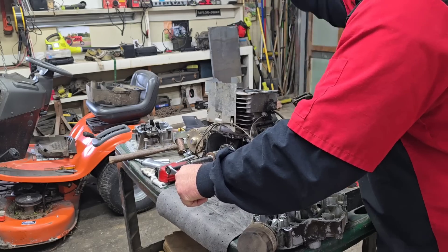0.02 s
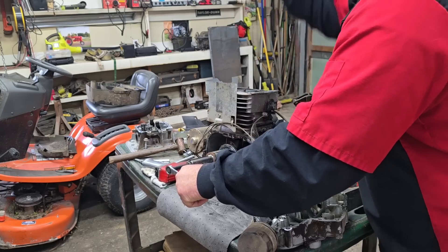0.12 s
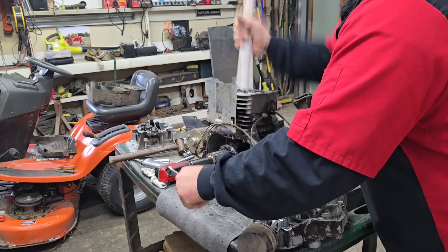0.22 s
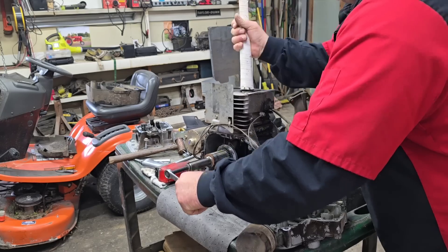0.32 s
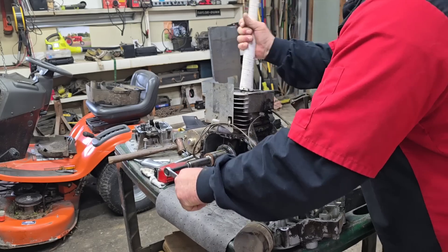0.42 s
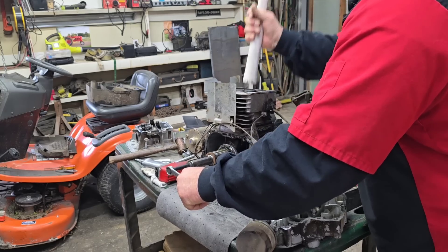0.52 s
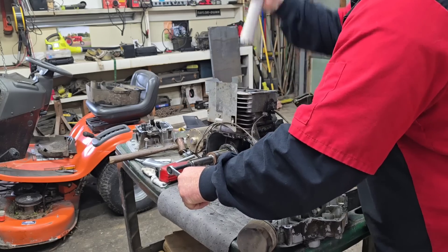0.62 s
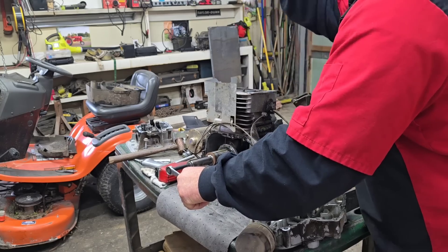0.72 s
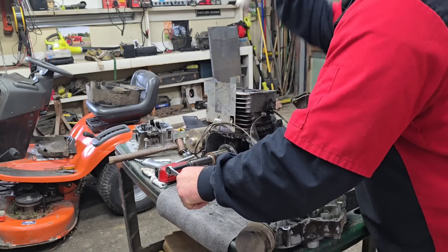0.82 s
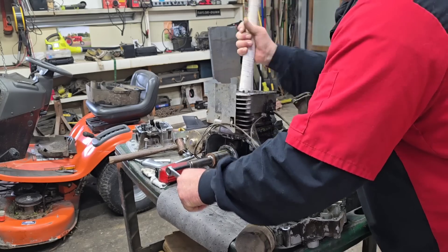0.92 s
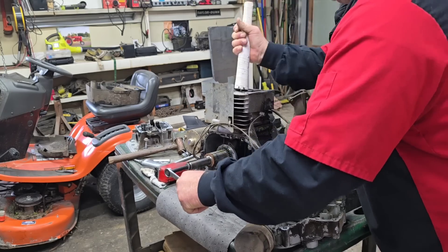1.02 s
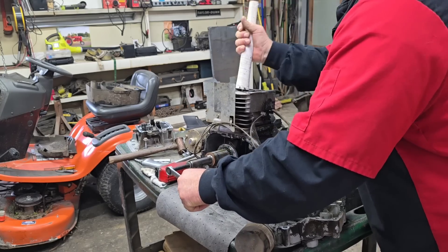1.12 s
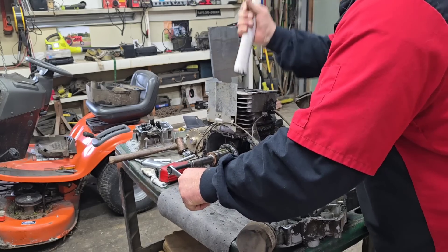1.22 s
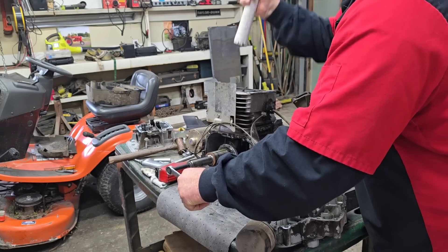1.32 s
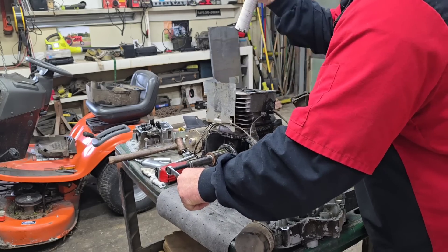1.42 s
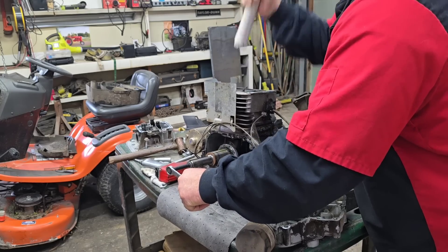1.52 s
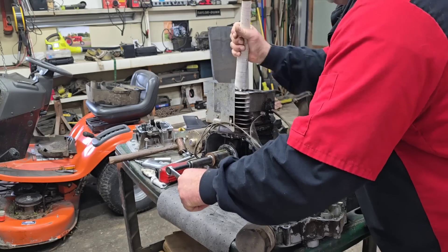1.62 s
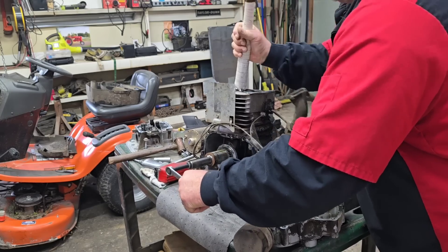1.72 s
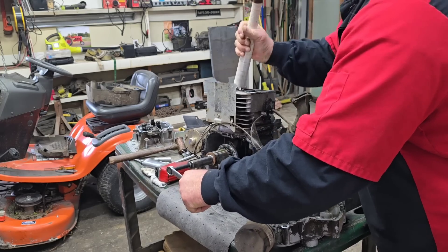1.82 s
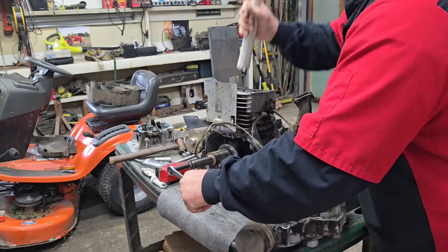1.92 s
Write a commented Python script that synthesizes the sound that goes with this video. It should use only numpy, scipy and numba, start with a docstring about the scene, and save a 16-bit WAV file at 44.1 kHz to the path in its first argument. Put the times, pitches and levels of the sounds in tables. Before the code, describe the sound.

A wooden-ended tool strikes a seized engine piston three times, loud cracks with low bench boom and metallic rattle, bounces and faint tool clinks between, in a quiet workshop, close microphone with flattened peaks.

```python
"""A barely audible workshop floor, then three heavy blows of a wooden-ended tool on a seized piston in an engine.
Each blow is a burst of contact noise that excites decaying modes of engine and bench, dense shaking and rattle.
Between blows the tool bounces (short noise), the engine rocks (low sines in dull noise), a loose part clacks
(noise and modes) and tools clink (thin sines). The recorder's limiter flattens the blows; its expander lowers the tails.
"""
import sys
import numpy as np
from scipy import signal
from scipy.fft import rfft, irfft
from scipy.io import wavfile
from scipy.ndimage import uniform_filter1d, minimum_filter1d
from numba import njit

SR = 44100
rng = np.random.default_rng(int(sys.argv[2]) if len(sys.argv) > 2 else 0)


def materialize(psi):
    """Save the field psi as 16-bit PCM at rate SR to the path in sys.argv[1].

    A 1-D psi becomes a single channel; in a 2-D psi each row is a channel.
    """
    bounded = np.clip(np.atleast_2d(psi).T, -1, 1)
    quanta = np.round(bounded * 32767).astype(np.int16)
    wavfile.write(sys.argv[1], SR, quanta)


N = 88200
BIN_HZ = np.fft.rfftfreq(N, 1 / SR)

# In every noise spectrum below, level_db is a relative density per Hz: noise() scales the sum to rms 1.


def gain(db):
    """Logarithmic level: decibels to amplitude factor."""
    return 10 ** (np.asarray(db) / 20)


def lookup(table, hz):
    """Logarithmic frequency scale: interpolate (pitch_hz, value) points on it."""
    table_hz, values = np.array(table, float).T
    return np.interp(np.log(hz + 1), np.log(table_hz), values)


def noise(spectrum, ripple_db=0):
    """Spectral shaping: white noise filtered to a given spectrum, with rms 1."""
    white = rfft(rng.standard_normal(N))
    shaped = irfft(white * gain(lookup(spectrum, BIN_HZ) + ripple_db), N)
    return shaped / np.std(shaped)


def since(start_s):
    """Causality: seconds since an event, zero before it."""
    return np.maximum(np.arange(N) / SR - start_s, 0)


def fade(t, t60_s, rise_s=0.0001):
    """Exponential damping: a quick rise, then a decay of 60 dB per t60."""
    return (1 - np.exp(-t / rise_s)) * np.exp(-np.log(1000) * t / t60_s)


def ring(t, modes, length, rise_s):
    """Modal superposition: a struck object sounds as a sum of decaying sines."""
    phases = rng.uniform(0, 2 * np.pi, len(modes))
    out = 0
    for (hz, db, t60_s), phase in zip(modes, phases):
        out = out + gain(db) * fade(t, t60_s * length, rise_s) * np.sin(2 * np.pi * hz * t + phase)
    return out


RIPPLE_DB, RIPPLE_SPACING_HZ = 3.5, 42.02  # spread of the random heights, distance between them


def resonances():
    """Modal density: close resonances of metal give random peaks and dips, full-sized from 1500 Hz up."""
    heights = np.clip(rng.standard_normal(2048), -2, 2)
    ripple = np.interp(BIN_HZ / RIPPLE_SPACING_HZ, np.arange(len(heights)), heights)
    return RIPPLE_DB * np.minimum(BIN_HZ / 1500, 1) * ripple


# spectrum of the quiet workshop: pitch_hz [Hz], level_db [dB per Hz]
FLOOR_SPECTRUM = [(25, -24.5), (70, -12.5), (140, -6.5), (200, -8), (290, 0.5), (400, -9.5), (1000, -19),
                  (4000, -25), (15000, -37.5)]
FLOOR_DB = -58.5


def workshop_floor():
    """Stationary noise: steady, faint and mostly low."""
    return gain(FLOOR_DB) * noise(FLOOR_SPECTRUM)


# spectrum of the workshop's long ring: pitch_hz [Hz], level_db [dB per Hz]
SHOP_SPECTRUM = [(40, -24), (130, -2), (300, -4), (600, -7), (1400, -9), (2600, -18.5), (4800, -11.5),
                 (7500, -27.5), (15000, -38)]
SHOP_DB, SHOP_T60_S = -29, 1.42  # t60 before the blow's length factor


def workshop_tail(t, length, metal):
    """Reverberation: a diffuse field builds up and decays as fading noise."""
    return gain(SHOP_DB) * noise(SHOP_SPECTRUM, metal) * fade(t, SHOP_T60_S * length, rise_s=0.026)


# small tools clinking: start_s [s], ring level_db [dB], pitch_hz [Hz], ring t60_s [s], tick level_db [dB]
CLINKS = [(.672, -47.5, 4380, .4, -41), (0.674, -56, 7830, .14, -72), (0.832, -62, 3130, 0.11, -39),
          (1.882, -46, 6578, .6, -37)]
# spectrum of their ticks: pitch_hz [Hz], level_db [dB per Hz]
TICK_SPECTRUM = [(150, 3), (600, 3), (1400, 0), (3000, -6.5), (5000, -5), (8000, -20), (15000, -32)]
TICK_T60_S = .05


def clinks():
    """Impact of small bodies: one tool touches another with a tick and a single thin mode."""
    out = 0
    for start_s, db, hz, t60_s, tick_db in CLINKS:
        t = since(start_s)
        tone = gain(db) * fade(t, t60_s) * np.sin(2 * np.pi * hz * t)
        tick = gain(tick_db) * noise(TICK_SPECTRUM) * fade(t, TICK_T60_S)
        out = out + tone + tick
    return out


# engine rocking on the bench: start_s [s], level_db [dB], pitch_hz [Hz], t60_s of the scuff [s]
THUMPS = [(.474, -9.5, 211, 0.1), (.505, -15, 179, 0.17), (.517, -11.5, 237, 0.059),
          (0.579, -25, 161, 0.24), (0.768, -28.5, 296.6, 0.056), (.774, -20, 256, .1),
          (0.798, -32, 110, 0.2), (1.149, -24, 192, .1), (1.224, -22.5, 151, 0.14), (1.353, -34, 201, 0.29),
          (1.861, -23, 236, 0.11), (1.873, -30.5, 110.4, 0.073)]
# spectrum of the dull scuff: pitch_hz [Hz], level_db [dB per Hz]
SCUFF_SPECTRUM = [(30, -31), (70, -11), (150, 3), (350, -2.5), (550, -20), (900, -20.5), (2000, -48),
                  (8000, -71)]
THUMP_RISE_S, SCUFF_DB = 0.0021, -4.5


def thumps():
    """Heavily damped impact: the engine settles with a short low note in a dull scuff."""
    out = 0
    for start_s, db, hz, t60_s in THUMPS:
        t = since(start_s)
        note = np.sin(2 * np.pi * hz * t) * fade(t, t60_s)  # faded again below, so it dies before the scuff
        scuff = gain(SCUFF_DB) * noise(SCUFF_SPECTRUM)
        out = out + gain(db) * fade(t, t60_s, THUMP_RISE_S) * (note + scuff)
    return out


# landings of a loose part: start_s [s], level_db [dB], t60_s of the noise [s]
CLACKS = [(1.105, -7.5, 0.073), (1.119, -16.5, 0.079), (1.129, -18, 0.27)]
# spectrum of the landing noise: pitch_hz [Hz], level_db [dB per Hz]
CLACK_SPECTRUM = [(300, -11.5), (1000, 1.5), (1700, 3.5), (2400, 4), (3100, -7), (4200, 2.5), (6000, -11.5),
                  (8000, -18), (9500, -33), (16000, -44)]
# modes of the part: pitch_hz [Hz], level_db [dB], t60_s before the length factor [s]
CLACK_MODES = [(1253, -26.5, 0.14), (1610, -7.5, 0.13), (2210, -9, 0.073), (2422, -7, .2),
               (3784, -20, 0.17), (5400, -15, 0.28)]


def clacks():
    """Repeated impact: a loose metal part falls back in three quick contacts, each exciting its own modes."""
    out, part = 0, resonances()
    for start_s, db, t60_s in CLACKS:
        t = since(start_s)
        contact = noise(CLACK_SPECTRUM, part) * fade(t, t60_s)
        out = out + gain(db) * (contact + ring(t, CLACK_MODES, length=0.39, rise_s=.0005))
    return out


# tool chattering on the piston: start_s [s], level_db [dB], t60_s [s]
KNOCKS = [(0.267, 5.5, 0.089), (0.293, -6.5, 0.13), (0.348, -16, 0.3), (.39, -20.5, 0.18),
          (1.019, -11, 0.032), (1.647, -8, 0.15)]
# spectrum of hard metal contact, also for crack and rattle: pitch_hz [Hz], level_db [dB per Hz]
CONTACT_SPECTRUM = [(150, -14), (600, 0), (1400, -2.5), (2400, -2.5), (3100, -4.5), (4400, 2.5),
                    (6300, -1.5), (8000, -14), (11000, -19.5), (16000, -34.5)]


def knocks(metal):
    """Rebound: the tool bounces and touches again in bright noise bursts."""
    out = 0
    for start_s, db, t60_s in KNOCKS:
        out = out + gain(db) * noise(CONTACT_SPECTRUM, metal) * fade(since(start_s), t60_s)
    return out


# clicks per second, t60 of the whole rattle before the length factor, t60 of one click
RATTLE_PER_S, RATTLE_T60_S, RATTLE_CLICK_T60_S = 310, .36, 0.035
RATTLE_DB, RATTLE_SCATTER_DB = -12.5, 1


def rattle(t, length, metal):
    """Random impacts: loose parts chatter in scattered clicks that die away."""
    strengths = gain(RATTLE_SCATTER_DB * np.clip(rng.standard_normal(N), -2, 2))
    clicks = (rng.random(N) < RATTLE_PER_S / SR) * strengths
    power_decay = np.exp(-2 * np.log(1000) / (RATTLE_CLICK_T60_S * SR))
    power = signal.lfilter([1], [1, -power_decay], clicks ** 2)
    envelope = np.sqrt(power / power.mean())
    return noise(CONTACT_SPECTRUM, metal) * envelope * fade(t, RATTLE_T60_S * length)


# spectrum of everything that is shaken: pitch_hz [Hz], level_db [dB per Hz]
BODY_SPECTRUM = [(30, -43), (60, -23), (130, 1.5), (300, 2.5), (700, -1.5), (1000, -7), (1600, -10),
                 (3000, -17), (4500, -19), (6300, -18.5), (8000, -28.5), (11000, -32.5), (16000, -44.5)]
# its decay: pitch_hz [Hz], t60_s before the length factor [s]
BODY_T60 = [(80, 0.77), (300, 0.39), (700, 0.53), (2000, 0.44), (5000, 0.61), (9000, .32), (15000, 0.1)]
BODY_DB, BODY_BASS_RISE_S = 1, .012  # the rise is the limit towards 0 Hz


def body(t, length, metal):
    """Statistical modes: countless close ones act as octave-band noise; lows build up later, the deepest last."""
    spectrum = rfft(noise(BODY_SPECTRUM, metal))
    octave = np.log2(np.clip(BIN_HZ, 64, 16384))
    out = 0
    for k in range(6, 15):
        hz = 2. ** k
        band = irfft(spectrum * np.maximum(1 - abs(octave - k), 0), N)  # overlapping triangles
        out = out + band * fade(t, lookup(BODY_T60, hz) * length, BODY_BASS_RISE_S / (1 + hz / 400))
    return out


# blows: start_s [s], level_db [dB], then dB added to bench boom, crack, engine ring and rattle, length [factor]
BLOWS = [(0.2421, 2, -5.5, 1.5, 0, -0.5, 1.002), (0.9389, 1.5, 4, 3.5, -5.5, -10, 0.97),
         (1.6095, 0.5, 1.5, -11, -1, 7, 0.8)]
# engine block and cooling fins: pitch_hz [Hz], level_db [dB], t60_s before the length factor [s]
ENGINE_MODES = [(529.4, -5.5, .45), (658, 3.5, 0.36), (722, 3.5, .38), (785, 0, .38), (1123, -12, .42),
                (1337, -9, .42), (1407, -4, 0.3), (1545, -14, 0.85), (1644, -11, 0.45), (2365, -11.5, .35),
                (4070, -14, .4), (4590, -14, 0.59), (5347, -0.5, .36), (5600, -12.5, .4)]
# bench under the engine: pitch_hz [Hz], level_db [dB], t60_s before the length factor [s]
BENCH_MODES = [(76, -14, 0.51), (128.75, -2, 0.43), (161.6, -6, .5), (225.7, 5.5, 0.3), (253.9, -2, 0.41),
               (289.1, 1.5, .38), (325.6, -5.5, 0.42), (379.7, -4.5, 0.33), (413.3, -4.5, 0.4)]
ENGINE_DB, BENCH_DB, BENCH_RISE_S = -7, -2.5, 0.027
CRACK_DB, CRACK_T60_S = 0, 0.16
SETTLE_S, SETTLE_SPREAD_S = 0.28, 0.025  # time to half amplitude before the length factor, softness of the stop


def blows(shared):
    """Impact excitation: crack, ringing, boom and rattle, stopped by friction, then the workshop's tail."""
    out = 0
    for start_s, db, boom_db, crack_db, ring_db, rattle_db, length in BLOWS:
        t = since(start_s)
        metal = (shared + resonances()) / np.sqrt(2)  # each blow favours other resonances
        crack = gain(CRACK_DB + crack_db) * noise(CONTACT_SPECTRUM, metal) * fade(t, CRACK_T60_S, rise_s=0.0016)
        engine = gain(ENGINE_DB + ring_db) * ring(t, ENGINE_MODES, length, rise_s=0.00058)
        bench = gain(BENCH_DB + boom_db) * ring(t, BENCH_MODES, length, BENCH_RISE_S)
        dense = gain(BODY_DB) * body(t, length, metal)
        loose = gain(RATTLE_DB + rattle_db) * rattle(t, length, metal)
        # friction stops the shaking rather suddenly
        settling = (1 - np.tanh((t - SETTLE_S * length) / (2 * SETTLE_SPREAD_S))) / 2
        shaking = (engine + bench + dense + loose) * settling
        out = out + gain(db) * (crack + shaking + workshop_tail(t, length, metal))
    return out


def scene():
    """Linear superposition: all sources add over the quiet workshop."""
    metal = resonances()
    small_sounds = clinks() + thumps() + clacks() + knocks(metal)
    return (workshop_floor() + small_sounds + blows(metal))[None]


@njit
def follow(x, attack, release):
    """Envelope detection: a peak follower with separate attack and release coefficients."""
    out, level = np.empty(len(x)), 0.
    for i in range(len(x)):
        level += (abs(x[i]) - level) * (attack if abs(x[i]) > level else release)
        out[i] = level
    return out


EXPAND_KNEE_DB = 4.5


def expand(band, threshold_db, depth_db):
    """Downward expansion: turn a band down once its short-time level is low."""
    level_db = 10 * np.log10(np.abs(uniform_filter1d(band ** 2, size=700)) + 1e-12)
    quietness = (1 - np.tanh((level_db - threshold_db) / EXPAND_KNEE_DB)) / 2
    return band * gain(-depth_db * quietness)


# bands of the recorder's expander: upper edge_hz [Hz], threshold_db [dB], depth_db [dB]
EXPANDER = [(650, -36.5, 10), (7200, -40.5, 15.5), (16000, -54.5, 12.5)]
LIMIT_DB, LIMIT_ATTACK_S, LIMIT_RELEASE_S = -1.42, 0.00015, 0.016
MIC_LOW_HZ, TOP_HZ = 42, 15800


def record(dry):
    """Dynamic range control: three-band expander, fast limiter, bass cut, rounded peaks and steep top cut."""
    x, rest = 0, dry[0]
    for edge_hz, threshold_db, depth_db in EXPANDER:  # what lies above the last edge is dropped
        band = signal.sosfiltfilt(signal.butter(4, edge_hz, fs=SR, output="sos"), rest)
        x = x + expand(band, threshold_db, depth_db)
        rest = rest - band
    attack, release = 1 - np.exp(-1 / (LIMIT_ATTACK_S * SR)), 1 - np.exp(-1 / (LIMIT_RELEASE_S * SR))
    peak = follow(x, attack, release)
    limiting = 1 / np.maximum(peak / gain(LIMIT_DB), 1)
    x = x * uniform_filter1d(minimum_filter1d(limiting, size=45), size=45)  # looks ahead, then smooths
    x = signal.sosfilt(signal.butter(2, MIC_LOW_HZ, "high", fs=SR, output="sos"), x)
    x = x / (1 + x ** 8) ** (1 / 8)  # rounded peaks
    return signal.sosfilt(signal.ellip(8, .2, 70, TOP_HZ, fs=SR, output="sos"), x)[None]


dry = scene()
out = record(dry)
materialize(out)
```